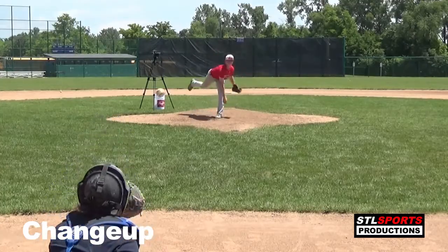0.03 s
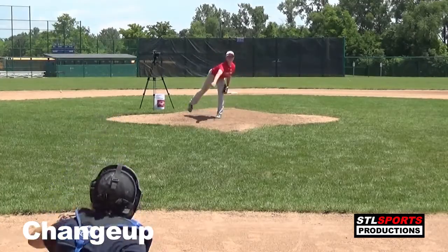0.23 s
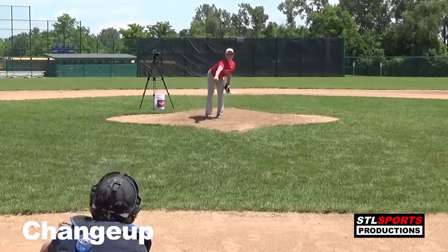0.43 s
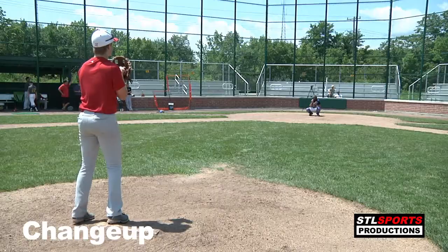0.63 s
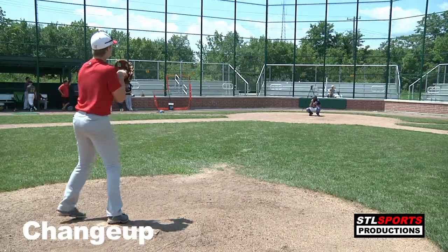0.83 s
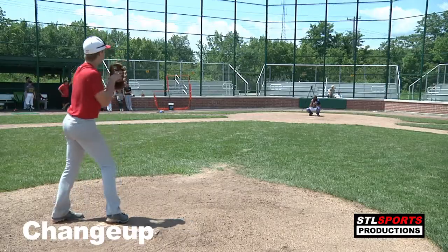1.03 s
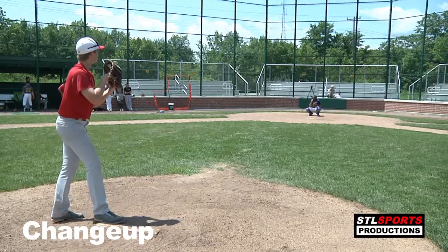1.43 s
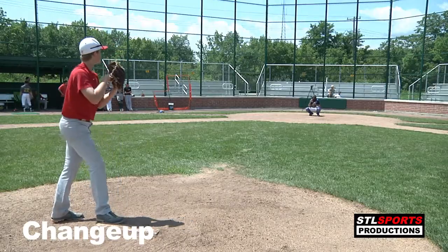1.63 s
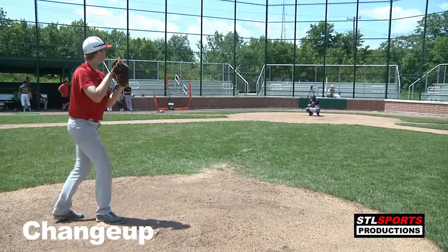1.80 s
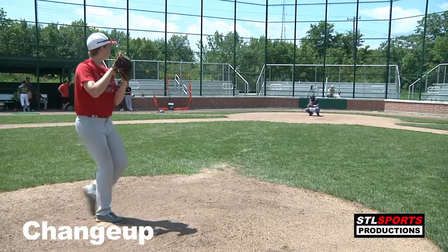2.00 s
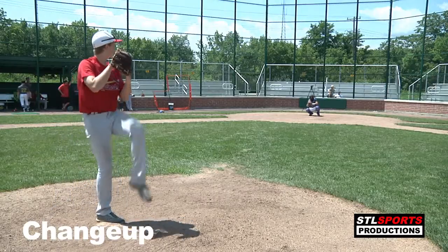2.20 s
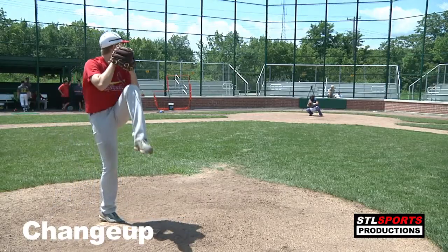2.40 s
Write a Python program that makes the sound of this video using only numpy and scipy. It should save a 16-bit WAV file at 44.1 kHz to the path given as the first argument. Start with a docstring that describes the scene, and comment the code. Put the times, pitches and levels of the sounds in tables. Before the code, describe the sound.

A baseball pops sharply into a catcher's mitt close by at about 0.2 seconds, followed instantly by a weaker, deeper slap and a short echo across the field. The leather crackles and creaks softly until 0.5 seconds. The background then switches to quiet open air with a low rumble and a distant engine drone, lasting to about 2.5 seconds. One faint, distant tap comes near 2.3 seconds.

```python
"""Open baseball field, behind the plate. A pitch brushes the rim of the catcher's mitt and pops the pocket.
A deeper slap follows, the backstop and stands throw the pop back, and the leather creaks as the mitt
closes. At 0.54 s the listening point jumps to the mound: open air, a low rumble, the firing tone and
overtones of a distant engine, and one faint tap near the end."""
import sys
import numpy as np
from scipy import signal
from scipy.fft import rfft, irfft
from scipy.io import wavfile
from scipy.ndimage import uniform_filter1d

SR = 44100
rng = np.random.default_rng(int(sys.argv[2]) if len(sys.argv) > 2 else 0)


def int16_out(signal):
    """Quantize to a 16-bit WAV file."""
    q = np.round(np.clip(np.atleast_2d(signal).T, -1, 1) * 32767)
    wavfile.write(sys.argv[1], SR, q.astype(np.int16))


N = 112454
TIME_S = np.arange(N) / SR
CATCH_S, MOVE_S = 0.2255, 0.54


def undb(db):
    return 10 ** (np.asarray(db) / 20)


def curve(rows, col=1):
    """Linear interpolation of one column over time."""
    rows = np.array(rows)
    return np.interp(TIME_S, rows[:, 0], rows[:, col])


def shaped(x, spectrum):
    """Filter x by (freq_hz, gain_db) points."""
    hz, db = np.array(spectrum, float).T
    bin_hz = np.arange(N // 2 + 1) * SR / N
    gain = undb(np.interp(np.log(bin_hz + 1), np.log(hz), db))
    return irfft(rfft(x) * gain, N)


def noise(spectrum):
    """Coloured noise, unit RMS."""
    x = shaped(rng.standard_normal(N), spectrum)
    return x / x.std()


def stereo_noise(spectrum, width):
    """Coloured mid/side noise, unit RMS."""
    side = shaped(noise(spectrum), width)
    x = noise(spectrum) + side * np.array([[1], [-1]])
    return x / x.std()


def band_noise(hz, width_hz):
    """Noise passed twice through a resonator, unit RMS."""
    b, a = signal.iirpeak(hz, hz / width_hz, fs=SR)
    x = signal.lfilter(b, a, signal.lfilter(b, a, rng.standard_normal(N)))
    return x / x.std()


def butter(x, kind, hz, order=2):
    return signal.sosfilt(signal.butter(order, hz, kind, fs=SR, output="sos"), x)


def pan(left_minus_right_db):
    return undb(np.array([[1], [-1]]) * left_minus_right_db / 2)


def delayed(x, delay_s):
    return np.roll(x, int(delay_s * SR), axis=-1)


def since(start_s):
    return np.maximum(TIME_S - start_s, 0)


def burst(start_s, rise_s, decay_s):
    age_s = since(start_s)
    return (1 - np.exp(-age_s / rise_s)) * np.exp(-age_s / decay_s)


def swell(u):
    """Rises to 1 at u = 1, then dies away."""
    return (u * np.exp(1 - u)) ** 2


def bump(centre_s, width_s):
    return np.exp(-((TIME_S - centre_s) / width_s) ** 2 / 2)


def drift(rate_hz):
    """Smooth random signal, spread near 1."""
    hold = int(SR / rate_hz)
    steps = np.repeat(rng.standard_normal(N // hold + 1), hold)
    return 1.3 * uniform_filter1d(uniform_filter1d(steps, hold), hold)[:N]


# Air behind the plate: freq_hz, density_db
PLATE_AIR_SPECTRUM = [(30, -28), (70, -16), (140, -6), (210, -11.5), (310, -5), (500, -10), (760, 2.5),
                      (1100, -3), (1350, -6), (1650, -6.5), (2200, -17), (2800, -13), (3600, -19),
                      (4500, -19.5), (8200, -23), (15000, -30.5)]
# Stereo width of the field: freq_hz, side_minus_mid_db
FIELD_SIDE = [(100, -36), (380, -16.5), (700, -10), (1300, -3), (2400, -6), (4400, -4), (8000, -8.5),
              (15000, -41)]


def plate_air():
    """Open air and far whistles; both drop out briefly before the catch."""
    air = undb(-53.5 - 0.22 * drift(30.5)) * stereo_noise(PLATE_AIR_SPECTRUM, FIELD_SIDE)
    gate = 1.0 * ((TIME_S < 0.2069) | (TIME_S > 0.2166))
    return (air + whistles()) * butter(gate, "low", hz=510)


# Far whistles: centre_s, width_s, pitch_hz, level_db
WHISTLE_TONES = [(.19, 0.028, 4485, -69), (.51, 0.024, 4470, -63)]


def whistles():
    """Thin high tones swell and fade in the distance."""
    return sum(undb(db) * bump(centre_s, width_s) * band_noise(hz, width_hz=94)
               for centre_s, width_s, hz, db in WHISTLE_TONES)


def thump(modes, start_s, sag_per_s=21):
    """Heavily damped modes swell briefly and sink in pitch as the leather gives."""
    age_s = since(start_s)
    out = 0
    for hz, db, peak_s, width_s in modes:
        phase = 2 * np.pi * hz * age_s * (1 - sag_per_s * (age_s / 2 - peak_s))
        out += undb(db) * bump(start_s + peak_s, width_s) * np.sin(phase)
    return out


# Pocket modes, low ones building later as the ball sinks in: pitch_hz, gain_db, peak_after_s, width_s
POCKET_MODES = [(174, -20.5, 0.0061, 0.0024), (315, -13, 0.0044, 0.0014), (662, -0.7, 0.0033, 0.0014),
                (1240, -7, 0.0021, 0.00091), (1463, -3.5, 0.0013, 0.00098), (2310, -6, 0.00074, 0.00079),
                (3640, -22, 0.002, .0009)]
# Leather on leather: freq_hz, density_db
SLAP_SPECTRUM = [(100, -9), (400, 5), (1000, 6), (2500, 3.5), (4500, -5), (7000, -3.5), (10000, -7),
                 (15000, -29)]
# Stereo width of the close slap: freq_hz, side_minus_mid_db
CLOSE_SIDE = [(100, -36), (1300, -9), (3000, -13), (8000, -23), (15000, -33)]


def catch():
    """The ball brushes the rim, then slaps the leather and pops the pocket."""
    pop = undb(-9.5) * thump(POCKET_MODES, CATCH_S)
    slap = undb(-23) * burst(CATCH_S, rise_s=0.0001, decay_s=0.0045)
    slap = slap * stereo_noise(SLAP_SPECTRUM, CLOSE_SIDE)
    graze = delayed(undb(-25.5) * pop + undb(-11.5) * slap, delay_s=-0.004)
    return (pop + slap + graze) * pan(0.5)


def grainy_noise(spectrum, grain):
    """Stereo noise broken into millisecond grains, unit RMS."""
    x = np.exp(grain * drift(900)) * stereo_noise(spectrum, FIELD_SIDE)
    return x / x.std()


# Leather and laces: freq_hz, density_db
CRACKLE_SPECTRUM = [(100, -7), (500, -10), (2000, 5.5), (4500, -4.5), (7500, -1.5), (10000, -2),
                    (15000, -21)]


def crackle():
    """Leather and laces crackle as they take up the ball."""
    envelope = undb(-38) * burst(CATCH_S, rise_s=0.0026, decay_s=0.061)
    return envelope * grainy_noise(CRACKLE_SPECTRUM, grain=0.45)


# Echoes off the stands: delay_s, spread_s, gain_db, treble_lift_db
STAND_ECHOES = [(.031, 0.0045, -23, 6), (0.045, 0.0063, -26, 11), (0.0498, 0.0034, -20, 9),
                (.057, .012, -23, -1), (0.122, 0.0088, -26.5, 15)]
# Stereo width of those echoes: freq_hz, side_minus_mid_db
ECHO_SIDE = [(100, -12), (350, -14), (700, -8), (1300, -10), (2400, 4), (4400, -1), (8000, -3),
             (15000, -23)]
# Early field tail: freq_hz, density_db
EARLY_SPECTRUM = [(100, -37), (300, 5.5), (700, 7.5), (1100, 1), (2300, -4), (4000, -13), (8000, -16.5),
                  (15000, -31)]
# Late field tail: freq_hz, density_db
LATE_SPECTRUM = [(50, -14), (130, -1), (350, 4.5), (800, 0), (2200, -3), (4000, -5), (8000, -15.5),
                 (15000, -42)]


def echoes(blow, wall_delay_s=0.0193):
    """A dull echo off the low backstop, scattered ones off the stands, and the field's tail."""
    def tail(spectrum, rise_s, t60_s):
        envelope = burst(CATCH_S + wall_delay_s, rise_s, t60_s / np.log(1000))
        return envelope * stereo_noise(spectrum, FIELD_SIDE)

    wall = undb(-9.5) * butter(delayed(blow, wall_delay_s), "low", hz=1700, order=4)
    mono = blow.mean(axis=0)
    stands = 0
    for delay_s, spread_s, db, lift_db in STAND_ECHOES:
        scatter = stereo_noise([(100, 0), (1500, 0), (6000, lift_db)], ECHO_SIDE)
        response = scatter * swell(2 * since(delay_s) / spread_s)
        echo = signal.fftconvolve(response, mono[None], axes=1)[:, :N]
        stands += undb(db) * echo * mono.std() / echo.std()
    early = undb(-29.5) * tail(EARLY_SPECTRUM, rise_s=0.0011, t60_s=0.16)
    late = undb(-41) * tail(LATE_SPECTRUM, rise_s=0.03, t60_s=0.78)
    return wall + stands + early + late


# Modes of the second slap: pitch_hz, gain_db, peak_after_s, width_s
SECOND_SLAP_MODES = [(355, -7, 0.0038, 0.0035), (597, -1, 0.0047, 0.0012), (860, -4.5, 0.0023, 0.0012),
                     (2050, -4, 0.0011, 0.00083), (3120, -10, 0.0023, 0.0011)]


def second_slap(start_s=0.2518):
    """A weaker, deeper slap from the left, with little bass."""
    slap = undb(-25) * burst(start_s, rise_s=0.00022, decay_s=0.0036)
    slap = slap * stereo_noise(SLAP_SPECTRUM, ECHO_SIDE)
    body = undb(-21.5) * butter(thump(SECOND_SLAP_MODES, start_s), "high", hz=200)
    return np.array([body, delayed(body, delay_s=0.0002)]) * pan(4.5) + slap


# Rubbing leather: freq_hz, density_db
RUB_SPECTRUM = [(200, -15), (1000, -19), (2300, 6), (7300, 2), (9000, -7), (15000, -18)]


def rub():
    """Leather rubs as the mitt squeezes shut."""
    return undb(-50.5) * bump(centre_s=0.373, width_s=0.018) * grainy_noise(RUB_SPECTRUM, grain=0.69)


# Leather slips: start_s, level_db, left_minus_right_db
SLIPS = [(0.337, -44, 12), (0.346, -44, -1), (0.3524, -30, 3), (0.3577, -35.5, 20), (.371, -49, 4),
         (0.3837, -37.5, 19), (.39, -39.5, 13), (.474, -45.5, 14), (0.492, -45, 9), (0.5083, -36, 5),
         (0.5202, -39, 10.5), (0.532, -37.5, 6)]
# Modes of one slip: pitch_hz, gain_db, peak_after_s
SLIP_MODES = [(3590, -7, 0.00042), (4500, -15.5, 0.00067), (6440, -6, 0.00038), (7000, -16.5, 0.00056)]
# Slip noise: freq_hz, density_db
GRIT_SPECTRUM = [(200, -18), (1500, -18), (3500, 7.5), (7500, 5), (9000, -5.5), (15000, -20)]


def creaks():
    """Stick-slip in the leather: each slip rings randomly detuned modes with a burst of grit."""
    grit = undb(-9) * stereo_noise(GRIT_SPECTRUM, FIELD_SIDE)
    out = 0
    for start_s, level_db, pan_db in SLIPS:
        age_s = since(start_s)
        slip = grit * burst(start_s, rise_s=0.0001, decay_s=0.0019)
        for hz, gain_db, peak_s in SLIP_MODES:
            detuned_hz = hz * (1 + 0.062 * rng.standard_normal())
            slip += undb(gain_db) * swell(age_s / peak_s) * np.sin(2 * np.pi * detuned_hz * age_s)
        out += undb(level_db) * pan(pan_db) * slip
    return out


# Soft knocks: start_s, level_db, pitch_hz, width_hz, decay_s
SOFT_KNOCKS = [(0.353, -50, 277, 250, 0.0091), (0.522, -34.5, 620, 467, 0.0081),
               (0.522, -44.5, 336, 260, 0.013), (2.252, -39.5, 162, 250, 0.0089)]


def knocks():
    """Dull knocks among the creaks, and a low one under the tap."""
    return sum(undb(db) * burst(start_s, 0.0029, decay_s) * band_noise(hz, width_hz)
               for start_s, db, hz, width_hz, decay_s in SOFT_KNOCKS)


# Air on the mound: freq_hz, density_db
MOUND_AIR_SPECTRUM = [(15, -7), (28, 4.5), (60, 7), (150, 1.5), (300, -8), (600, -6.5), (1000, -12.5),
                      (2100, -17), (3300, -23.5), (4500, -32.5), (6500, -31.5), (10000, -36.5),
                      (15500, -39)]
# Stereo width on the mound: freq_hz, side_minus_mid_db
MOUND_SIDE = [(100, -16.5), (380, -20.5), (700, -21.5), (1300, -17), (2400, -20), (4400, -1.5),
              (15000, -1.5)]
# Rumble colour: freq_hz, density_db
RUMBLE_SPECTRUM = [(25, -13), (60, 2.5), (130, 2), (200, -5), (360, -6), (420, 0.5), (490, -10.5),
                   (700, -11.5), (1500, -26.5), (5000, -47.5)]
# Rumble envelope: time_s, level_db
RUMBLE_ENVELOPE = [(.55, -49.5), (.68, -49), (.85, -52), (1.15, -57), (1.55, -63.5), (1.8, -59.5),
                   (2.05, -58.5), (2.3, -54.5), (2.54, -54.5)]


def mound_air():
    """Steady open air, a shifting rumble and one soft swell of hiss."""
    air = undb(-53 - 0.22 * drift(6.36)) * stereo_noise(MOUND_AIR_SPECTRUM, MOUND_SIDE)
    rumble_db = curve(RUMBLE_ENVELOPE) + 1.5 * drift(18)
    rumble = undb(rumble_db) * stereo_noise(RUMBLE_SPECTRUM, MOUND_SIDE)
    hiss = stereo_noise([(400, -14), (1600, 0), (2500, -4), (4500, -22), (15000, -40)], MOUND_SIDE)
    return air + rumble + undb(-67.5) * bump(centre_s=1.29, width_s=0.31) * hiss


# Engine firing tone: time_s, firing_hz, level_db
ENGINE_FIRING = [(.54, 66.7, -47.5), (.66, 66.82, -54), (.74, 67.4, -44), (.88, 67.15, -42.5),
                 (1.0, 67.5, -48.5), (1.2, 67.84, -46), (1.42, 67.74, -56.5), (1.55, 67.15, -53.5),
                 (1.68, 67.74, -47.5), (1.86, 67.6, -48.5), (1.99, 66.14, -54.5), (2.08, 68.42, -50),
                 (2.23, 68.1, -47.5), (2.32, 66.9, -56), (2.4, 65.6, -51), (2.54, 66.4, -70)]
# Engine overtones: harmonic, level_db
ENGINE_OVERTONES = [(2, -59.5), (3, -65.5), (4, -67), (6, -73.5)]


def engine(waver_db=3.5, overtone_follow=0.15):
    """A far engine drones at its firing rate; wavering overtones partly follow its swells."""
    firing_hz = curve(ENGINE_FIRING) * (1 + 0.0054 * drift(11.93))
    phase = 2 * np.pi * np.cumsum(firing_hz) / SR
    level_db = curve(ENGINE_FIRING, col=2)
    swell_db = overtone_follow * (level_db - level_db.mean())
    tone = undb(level_db) * np.sin(phase)
    for harmonic, db in ENGINE_OVERTONES:
        gain = undb(db + swell_db + waver_db * drift(14))
        tone += gain * np.sin(harmonic * phase + 1.1 * drift(18))
    return np.sqrt(2) * tone  # RMS to peak


# Tap resonances: pitch_hz, width_hz, level_db, decay_s
TAP_MODES = [(1095, 36, -61, 0.04), (1934, 500, -60, 0.013), (3120, 130, -56, 0.009),
             (3340, 360, -67.5, 0.073), (5950, 640, -69, 0.022)]


def tap(start_s=2.256, rise_s=0.0014):
    """One faint, distant tap rings briefly."""
    return sum(undb(db) * burst(start_s, rise_s, decay_s) * band_noise(hz, width_hz)
               for hz, width_hz, db, decay_s in TAP_MODES)


def scene(crossfade_s=0.0067):
    """The catch from behind the plate, then the mound."""
    blow = catch()
    plate = blow + second_slap() + echoes(blow) + crackle() + rub() + creaks() + plate_air()
    left, right = (mound_air() + engine()) * pan(1.5)
    mound = np.array([left, delayed(right, delay_s=0.00009)])
    moved = np.clip((TIME_S - MOVE_S) / crossfade_s + 0.5, 0, 1)
    return plate * (1 - moved) + mound * moved + knocks() + tap()


def record(dry):
    """Steep low-pass at 15.6 kHz."""
    return signal.sosfilt(signal.ellip(10, 0.2, 80, 15600, fs=SR, output="sos"), dry)


dry = scene()
out = record(dry)
int16_out(out)
```